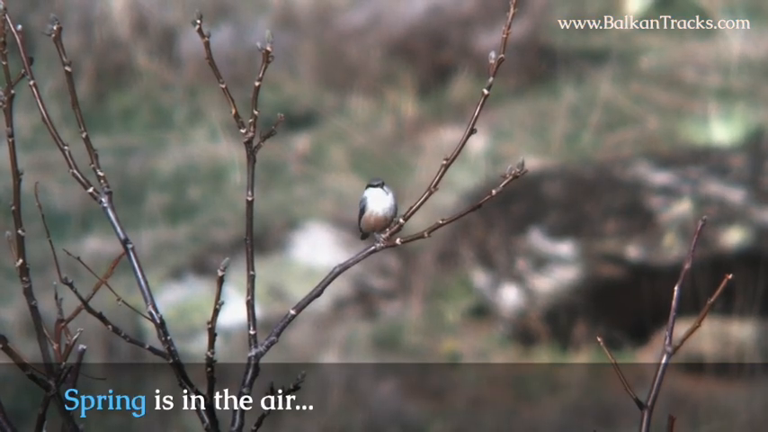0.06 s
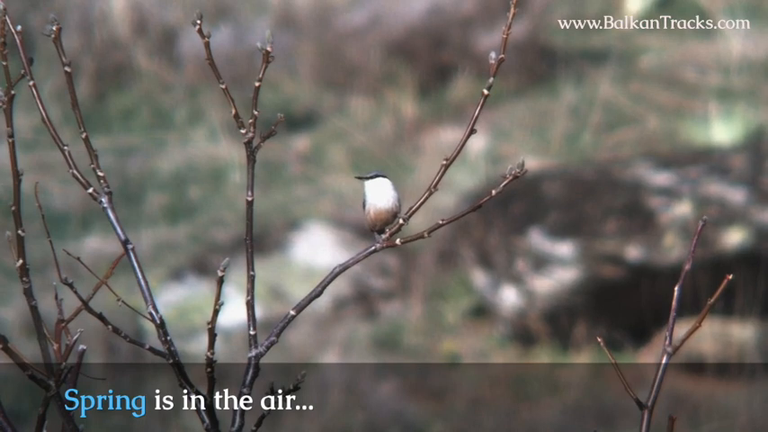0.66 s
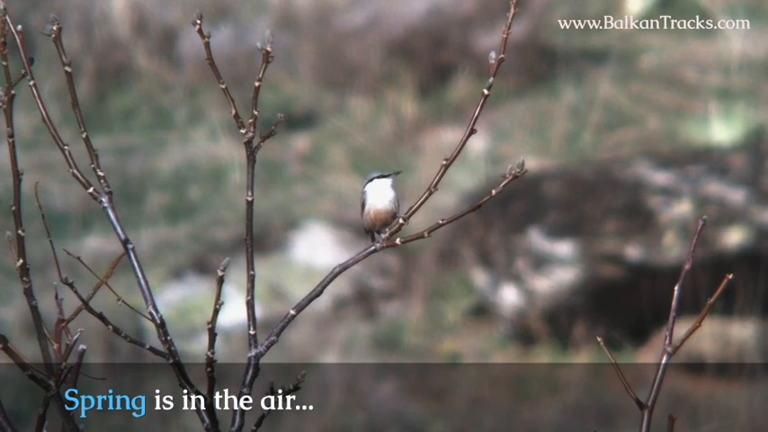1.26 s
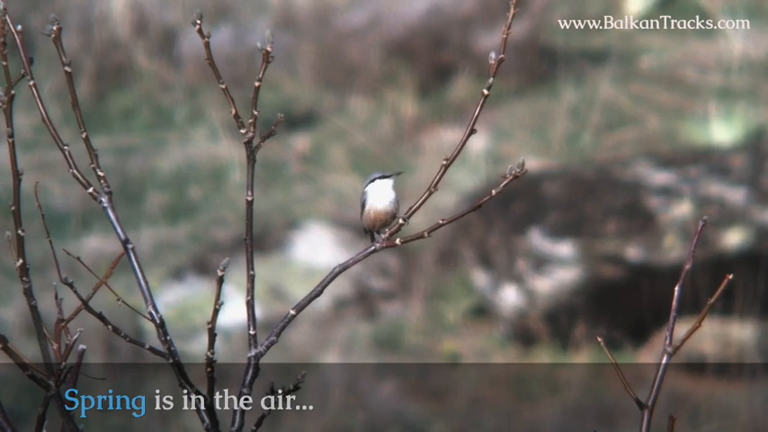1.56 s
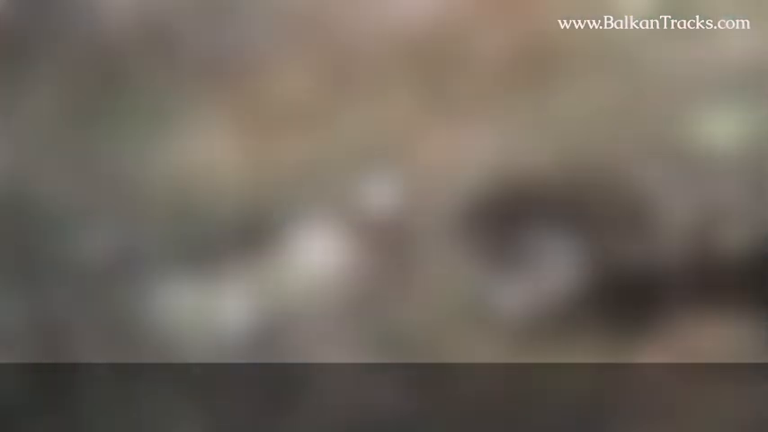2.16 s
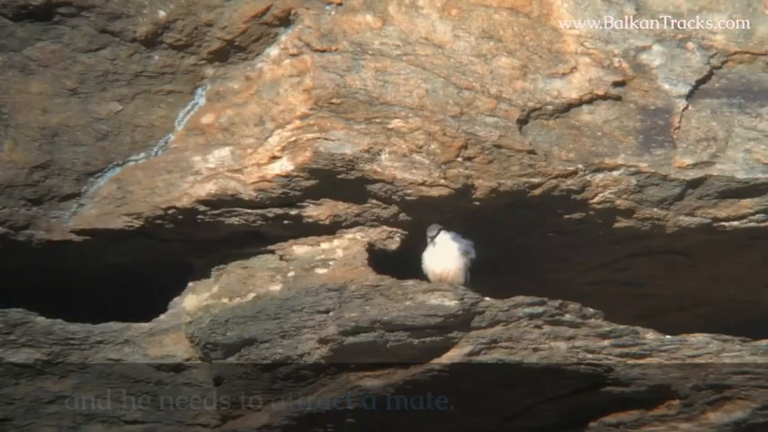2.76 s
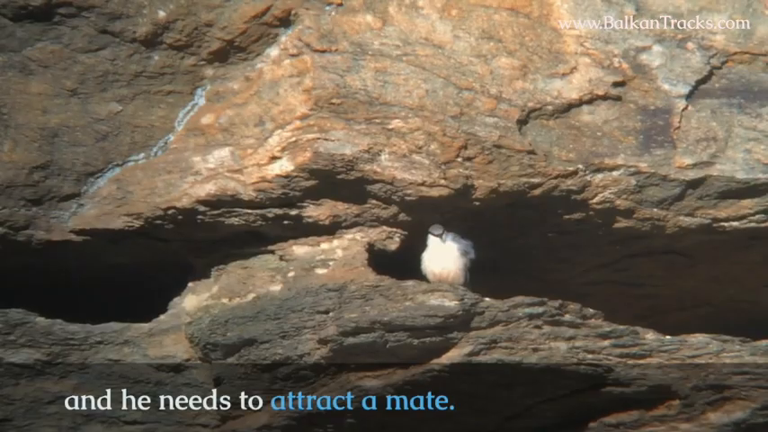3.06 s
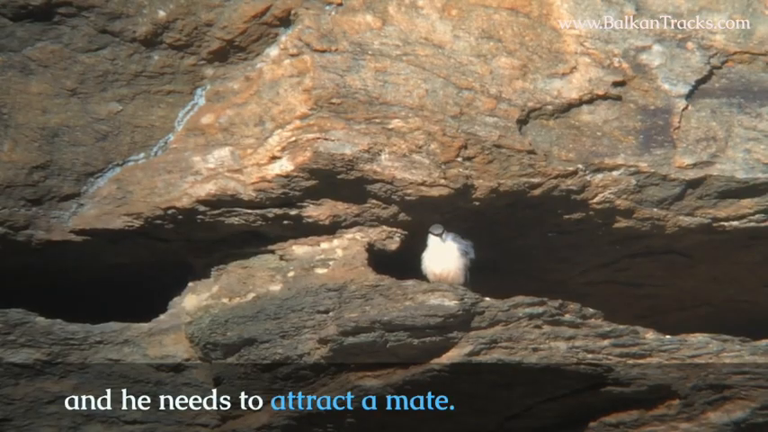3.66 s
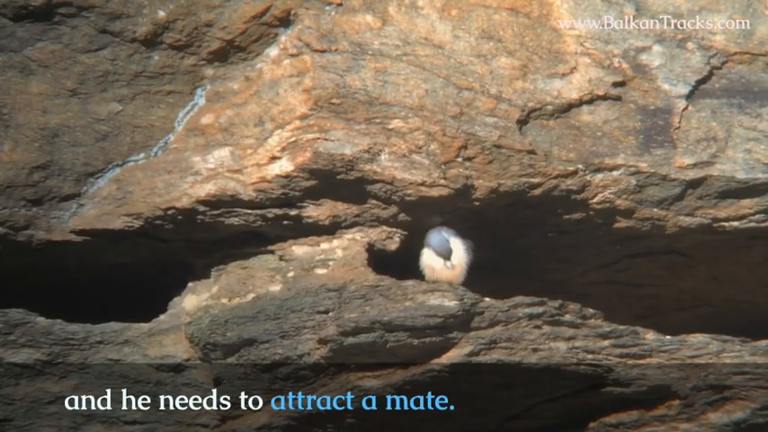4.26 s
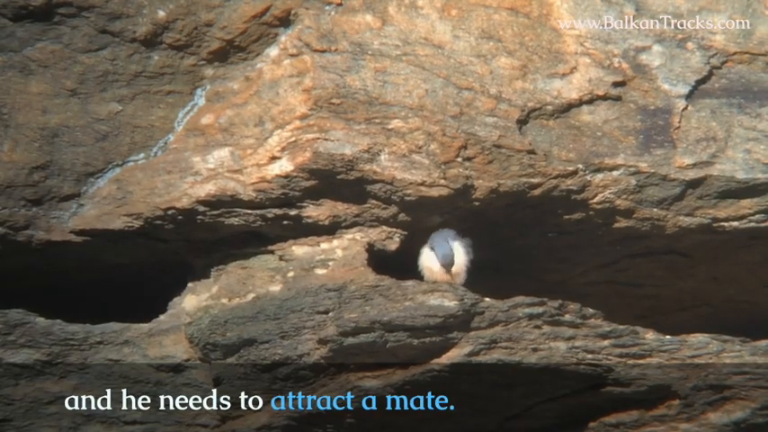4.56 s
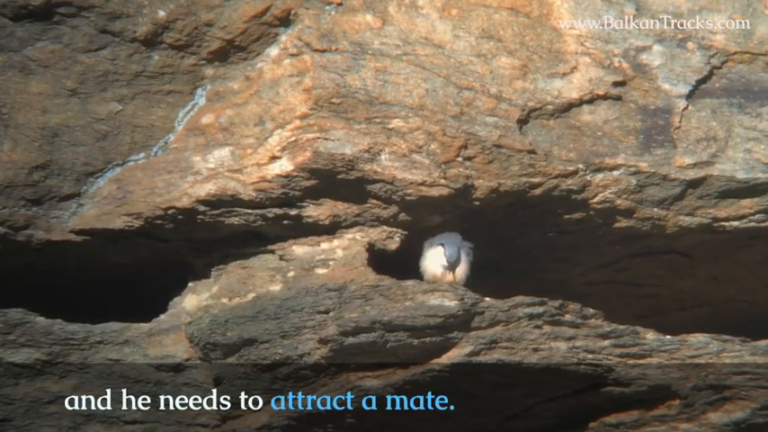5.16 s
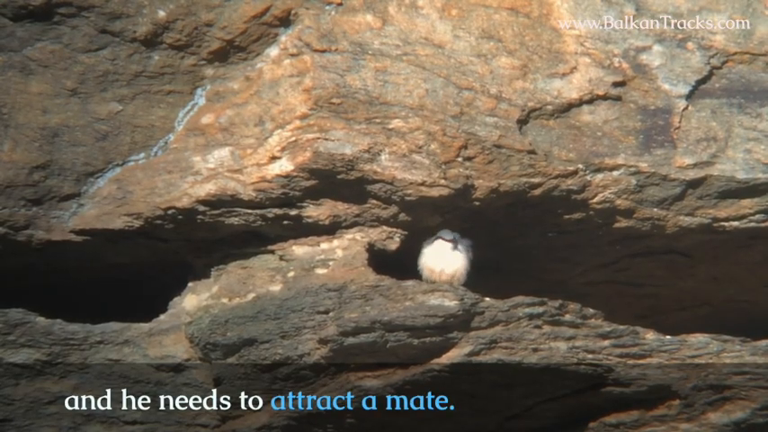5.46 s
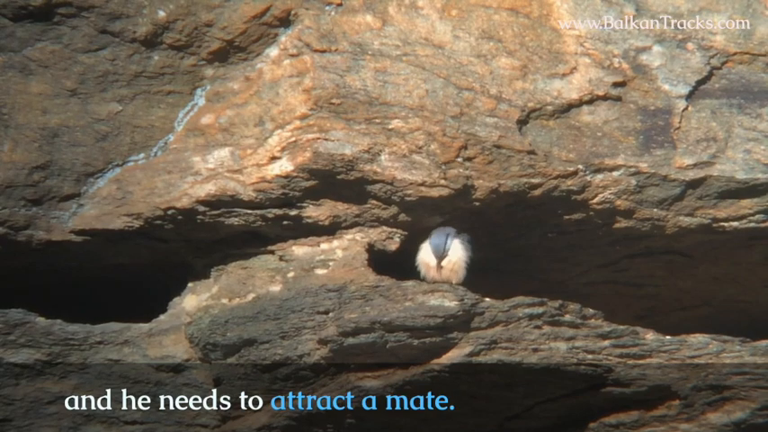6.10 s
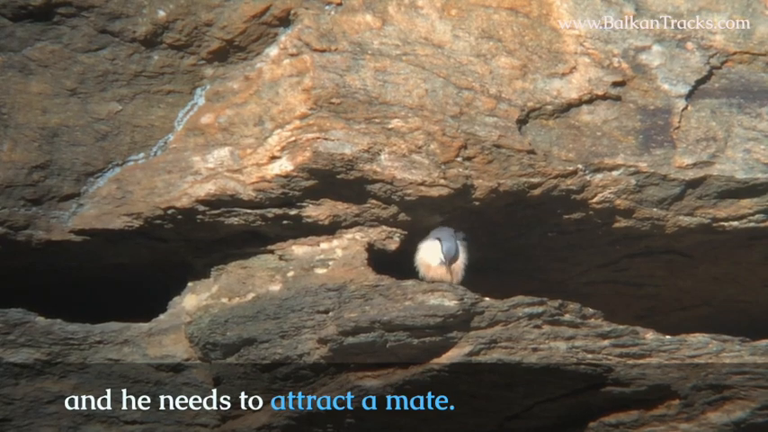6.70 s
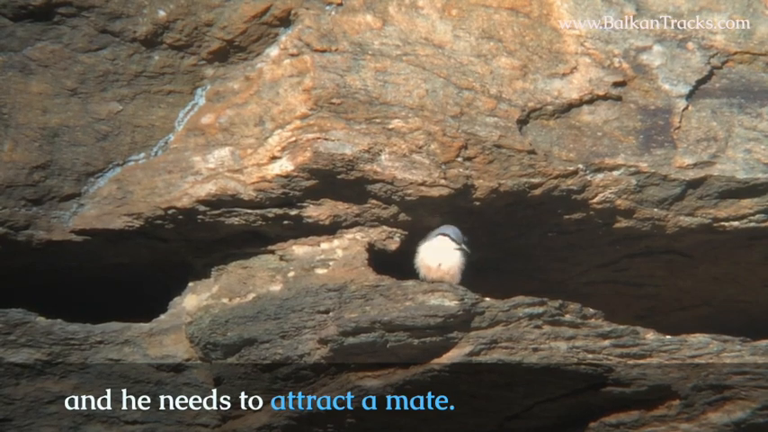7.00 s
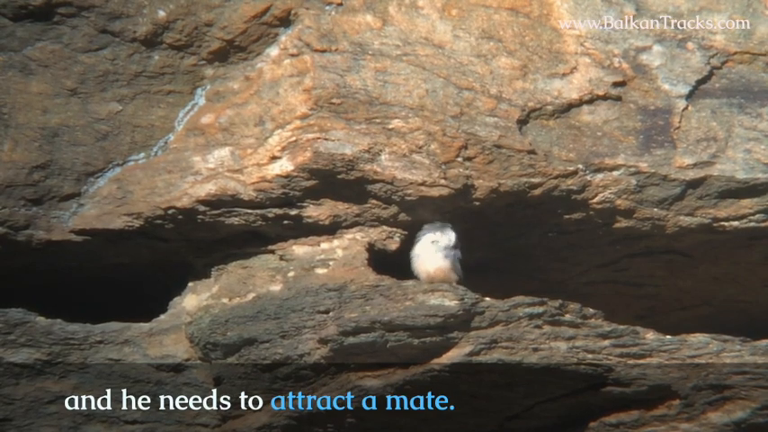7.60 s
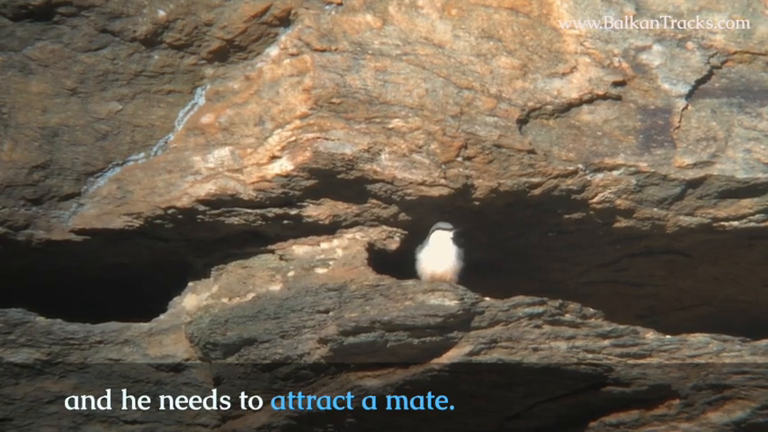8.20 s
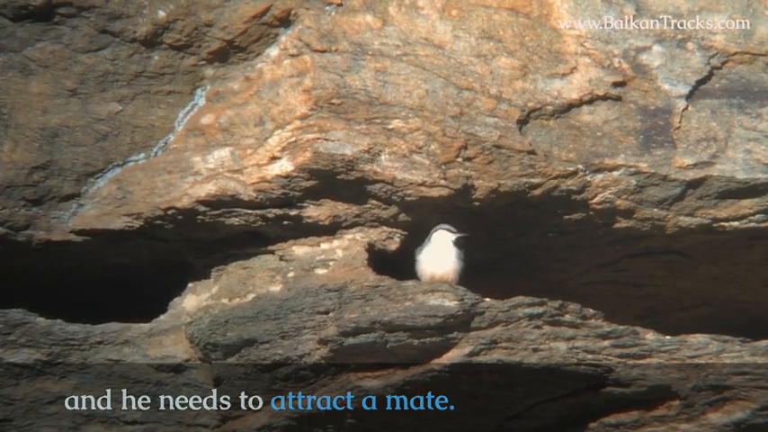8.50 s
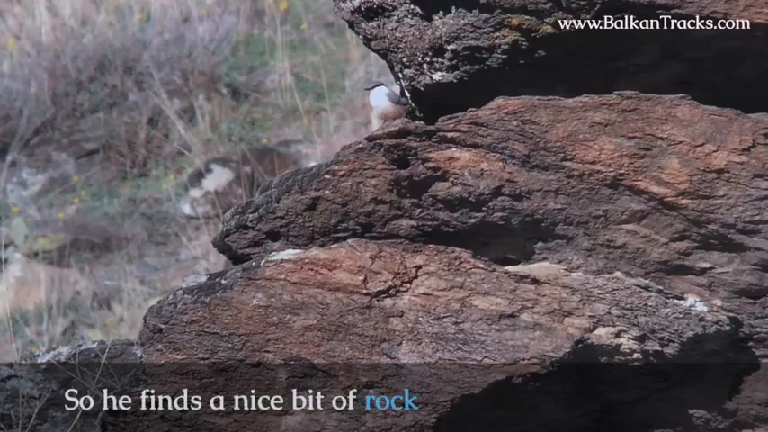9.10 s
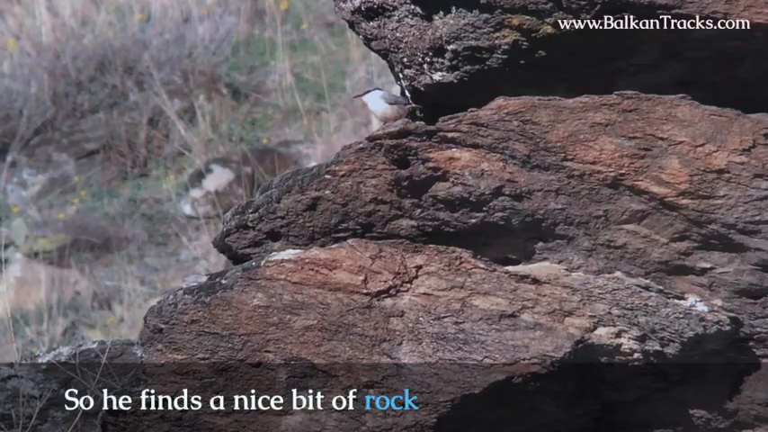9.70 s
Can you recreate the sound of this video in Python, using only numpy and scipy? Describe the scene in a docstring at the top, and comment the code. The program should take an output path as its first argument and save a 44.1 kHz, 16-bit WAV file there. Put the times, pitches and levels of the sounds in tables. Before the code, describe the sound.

A small songbird sings two trills of fast rising whistles outdoors, with faint distant birds and low wind buffeting the microphone.

```python
"""Two trills of fast upward whistles ring among rocks: a rock nuthatch, whose syrinx sweeps in pitch while
its beak filters the overtones and stone reflects each note. Other small birds twitter far off, mostly
between the trills, over the rush of a quiet valley, a few thin tones and a low drone. Gusts buffet the
microphone with turbulent pressure, die away in the middle and return with a few hard thumps."""
import sys
import numpy as np
from scipy import signal
from scipy.fft import rfft, irfft, next_fast_len
from scipy.io import wavfile
from scipy.ndimage import uniform_filter1d, map_coordinates

SR = 44100
rng = np.random.default_rng(int(sys.argv[2]) if len(sys.argv) > 2 else 0)


def store_wav(level_fs):
    """Save 16-bit WAV to argv[1]."""
    pcm = np.round(np.clip(np.atleast_2d(level_fs), -1, 1) * 32767)
    wavfile.write(sys.argv[1], SR, pcm.T.astype(np.int16))


N = 434385

# basic shape of a whistle, a long rise and a flick: time_from_flick_s, pitch_hz, whistle_db, overtones_db
SWEEP = [(-.07, 1480, -34.5, -13.5), (-.064, 1530, -28, -11.5), (-.054, 1700, -22.5, -10.5),
         (-.039, 2220, -14.5, -2.5), (-.032, 2550, -14, -8.5), (-.012, 3030, -0.5, 5),
         (-.003, 3280, 1.1, 2), (.0005, 3670, -13, 1.5), (.004, 3884, -11, 2.5), (.01, 4050, -48, -37)]
# gusts at the microphone: start_s, length_s, level_db, brightness_db
GUSTS = [(0.0, 0.18, -48, -18), (0.361, 0.092, -47, -23), (0.607, 0.074, -46, -11),
         (0.719, 0.1, -48.5, -15), (0.912, 0.12, -48.5, -16), (1.132, 0.056, -52, -6),
         (1.222, 0.1, -47, -12.5), (1.422, 0.082, -44, -17), (1.566, 0.078, -47.5, -18.5),
         (1.779, 0.052, -45.5, -13), (1.917, 0.069, -45, -15.5), (2.227, 0.13, -51.5, -19),
         (2.487, 0.13, -56.5, -17), (2.632, 0.098, -47.5, -20), (2.894, 0.063, -52.5, -17),
         (3.02, 0.09, -57, -15), (3.232, 0.036, -50, -11), (3.343, 0.035, -46.5, -16),
         (3.424, 0.031, -53.5, -15), (3.545, 0.06, -49.5, -9), (3.746, 0.076, -46.5, -10),
         (3.956, 0.11, -44.5, -9.5), (8.31, 0.064, -58, -12.5), (8.465, 0.03, -46, -15),
         (8.663, 0.098, -49.5, -10.5), (8.818, 0.04, -42.5, -14), (8.999, 0.035, -42.5, -9.5),
         (9.154, 0.049, -37.5, -6), (9.288, 0.086, -47.5, -8), (9.408, 0.088, -45, -8.5),
         (9.696, 0.023, -44, -21), (9.796, 0.026, -42.5, -9)]


def nuthatch(echo_s=.0295, stones_s=.0017, stones_db=-18, crags_db=-6, slope_db=-19, catch_lead_s=.027):
    """Reflection: a flat rock face echoes each note; stones, crags and the slope scatter it diffusely."""
    # notes of the trills: flick_s, level_db, pitch_factor, length_factor, push_db
    notes = [(0.0902, -22, 1.022, .98, -1), (0.2735, -22, 0.99, 1.005, -.5),
             (0.4543, -22.5, 1.002, 1.0, -1.5), (0.637, -22.5, 1.004, 0.97, -2),
             (0.8246, -23, 1.005, 0.93, -1), (1.022, -24.5, 1.018, 1.04, 2.5),
             (1.227, -23.5, 1.007, 0.94, 4), (8.673, -32, 0.96, 0.9, -0.5),
             (8.8637, -26, 0.995, 0.97, -0.5), (9.0465, -23.5, 1.017, .95, 0),
             (9.2244, -23, 0.99, 1.04, -1.5), (9.4061, -22.3, 1.008, 0.99, -1),
             (9.591, -23.5, 1.006, 0.97, -1.5), (9.7747, -23.5, 1, 0.96, -1)]
    # reflection from the rock face: frequency_hz, gain_db
    face = [(1500, -12), (2450, -11), (2900, -22.5), (3300, -28.5), (4000, -21), (11000, -18), (14000, -28)]
    # reverberation of nearby stones, of crags and of the whole slope: frequency_hz, t60_s
    stone_decay = [(3000, 0.2), (12000, 0.066)]
    crag_decay = [(2000, 0.2), (3200, 0.12), (12000, 0.073)]
    slope_decay = [(500, 0.44), (3000, 1), (6000, 0.42), (12000, .25)]
    reflection = amp(along(face, np.fft.rfftfreq(SR // 8, 1 / SR)))
    out = np.zeros(N)
    for s, db, pitch, length, push_db in notes:
        start = s + SWEEP[0][0] * length
        add(out, start - catch_lead_s, amp(-55) * catch())
        voice = amp(db) * whistle(pitch, length, push_db)
        echo = irfft(rfft(voice, SR // 8) * reflection)
        add(out, start, voice)
        add(out, start + stones_s, amp(stones_db) * scatter(voice, stone_decay))
        add(out, start + echo_s / 2, amp(crags_db) * scatter(echo, crag_decay))
        add(out, start + echo_s, echo)
        add(out, start + echo_s, amp(slope_db) * scatter(echo, slope_decay))
    return out


def whistle(pitch, length, push_db, bow_per_db=.002):
    """Source and filter: the syrinx sweeps upward while the opening beak recolours its harmonics."""
    # response of the beak: frequency_hz, nearly_shut_db, wide_open_db
    beak = [(3200, -22.5, -27.5), (3794, -35.5, -38), (4180, -50, -52), (5200, -41.5, -40),
            (6400, -53, -41.5), (8350, -59, -46.5), (9440, -51, -47.5), (10540, -30.5, -40),
            (11680, -37.5, -33), (12500, -46.5, -40.5), (14300, -62.5, -31.5), (15500, -55.5, -41.5)]
    band, shut_db, open_db = np.transpose(beak)
    when, hz, whistle_db, overtones_db = np.transpose(SWEEP)
    t = np.arange(when[0] * length, when[-1] * length, 1 / SR) / length
    shake = np.interp(t, [-.074, -.066, -.03], [.04, .008, .002])  # the syrinx is unsteady at first
    f = pitch * np.interp(t, when, hz) * (1 + shake * wobble(900, len(t)) + .011 * wobble(100, len(t)))
    middle = np.interp(t, [-.06, -.028, -.006], [0, 1, 0])
    f *= 1 + bow_per_db * push_db * middle  # a pushed note bows upward, brightens and swells
    phase = 2 * np.pi * np.cumsum(f) / SR
    voice = amp(np.interp(t, when, whistle_db) + .9 * wobble(130, len(t))) * np.sin(phase)
    bright_db = np.interp(t, when, overtones_db) + 1.6 + .97 * push_db
    gape = np.clip((f - 2300) / 1100, 0, 1)
    rasp = .11 * wobble(1500, len(t))  # cycle jitter frays the high overtones
    for k in range(2, 9):
        colour_db = (1 - gape) * np.interp(k * f, band, shut_db) + gape * np.interp(k * f, band, open_db)
        gain = amp(bright_db + colour_db + 1.6 * wobble(90, len(t)))
        voice += gain * (k * f < SR / 2) * np.sin(k * (phase + rasp))
    return voice * amp(push_db * middle)


def catch(length_s=.031, hz=2100, roughness=.12, sizzle_db=-18):
    """Onset transient: the syrinx starts with a hoarse, irregular sound just ahead of each whistle."""
    u = np.linspace(0, 1, int(length_s * SR))
    f = hz * (1 + .037 * rng.normal() + .2 * (u - .5) + roughness * wobble(1000, len(u)))
    tone = np.interp(u, [0, .18, .3, 1], [0, .54, .82, .48]) * sine(f)
    sizzle = amp(sizzle_db) * np.sqrt(u) * sine(11200 + 1100 * wobble(2500, len(u)))
    return signal.windows.tukey(len(u), .15) * amp(2.5 * wobble(250, len(u))) * (tone + sizzle)


def wind(lumps_db=3, edge_growth=1.49):
    """Turbulence: eddies hit the microphone in lumps, reaching higher in pitch in the brighter gusts."""
    # pressure spectrum of the eddies: frequency_hz, density_db
    buffet = [(12, -49.5), (20, -18.5), (86, -0.5), (120, 1), (216, -8), (328, -25), (369, -30.5),
              (497, -37.5), (700, -37.5), (910, -64), (1540, -120)]
    eddies = amp(lumps_db * wobble(60, N))
    bright_db, = curves([(s + length / 2, brightness) for s, length, _, brightness in GUSTS])
    edge = noise([(100, -25), (250, -1.5), (400, -7.5), (700, -28), (1300, -50.5)])
    swirl = unit(eddies * noise(buffet)) + amp(edge_growth * bright_db) * unit(eddies ** 2 * edge)
    power = np.abs(uniform_filter1d(swirl ** 2, size=SR // 12))
    return airflow() * swirl / np.sqrt(power + 1e-9)  # the airflow alone sets the slower swells


def airflow(fade_s=.01, unsteady_db=3, attack_s=.0081, release_s=.013):
    """Amplitude envelope of the wind: gusts rise, hold and decay exponentially over an unsteady breeze."""
    # spells of breeze: start_s, end_s, first_db, last_db
    breeze = [(0, 2.09, -56.5, -54.5), (2.09, 4.08, -64.5, -57.5), (8.29, 9.85, -64.5, -63.5)]
    t = np.arange(N) / SR
    flow = np.zeros(N)
    for start, end, first_db, last_db in breeze:
        fade = np.clip(np.minimum(t - start, end - t) / fade_s, 0, 1)
        flow += fade * amp(np.interp(t, [start, end], [first_db, last_db]))
    flow *= amp(unsteady_db * wobble(13, N))
    for s, length, db, _ in GUSTS:
        away = np.maximum(s - t, 0) / attack_s + np.maximum(t - s - length, 0) / release_s
        flow = np.maximum(flow, amp(db) * np.exp(-away))
    return flow


def thumps(width_rad=1.32):
    """Pressure pulses: a hard eddy is a swing or two of pressure."""
    # hard eddies: middle_s, level_db, pitch_hz
    eddies = [(1.926, -33.5, 143), (8.827, -31, 85), (8.845, -29.5, 122.6), (8.859, -26, 398),
              (9.013, -32, 99.3), (9.156, -35, 151), (9.171, -24.5, 162), (9.349, -28.5, 420),
              (9.44, -31.5, 277), (9.491, -36, 238), (9.706, -33.5, 122)]
    out = np.zeros(N)
    t = np.arange(-SR // 30, SR // 30) / SR
    for s, db, hz in eddies:
        phase = 2 * np.pi * hz * t
        add(out, s + t[0], amp(db) * np.sin(phase) / np.cosh(phase / width_rad))
    return out


def far_birds(wet_db=-1.5, waver=.011, blur_per_db=.0029, near_db=-66):
    """Direct-to-reverberant ratio: the fainter a call, the more blurred and reverberant it arrives."""
    direct, send = np.zeros(N), np.zeros(N)
    for s, db, length, pitches, warble in far_calls():
        call = amp(db) * chirp(length, *pitches, waver + blur_per_db * max(near_db - db, 0), warble)
        add(direct, s - length / 2, call)
        add(send, s - length / 2, amp(.34 * (-71 - db)) * call)
    return direct + amp(wet_db) * scatter(send, [(2000, .2), (6000, .26)])[:N]


def far_calls(sag=.0592, warble=.048):
    """Pitch contours of the far calls: middle_s, level_db, length_s, three pitches_hz, warble_depth."""
    # high hairpin calls, rising slurs and falling slurs: middle_s, middle_hz, level_db
    arches = [(1.415, 5540, -75), (1.51, 5350, -77), (1.864, 5640, -76), (1.975, 5470, -77),
              (2.5, 5030, -72.5), (2.6, 5030, -75), (2.95, 5630, -69.5), (3.045, 5300, -74.5),
              (3.797, 5880, -64), (3.795, 6650, -68), (3.85, 5830, -61.5), (3.852, 6850, -69),
              (5.79, 5700, -76.5), (6.835, 4970, -80), (7.44, 5850, -71), (7.885, 5300, -73),
              (7.962, 4930, -73.5)]
    upslurs = [(1.332, 3240, -62.5), (1.432, 2520, -66.5), (1.552, 3550, -65), (3.28, 3480, -70.5),
               (3.752, 3280, -66.5), (3.925, 4180, -66), (7.572, 1650, -72.5)]
    downslurs = [(2.545, 2210, -74), (3.015, 1990, -72), (3.068, 2610, -71), (3.13, 2100, -74.5),
                 (3.367, 2080, -76), (4.29, 3550, -75), (4.637, 2710, -70.5), (4.84, 2480, -73),
                 (4.95, 2570, -64), (4.978, 1756, -78), (5.318, 3830, -73.5), (5.80, 2490, -77),
                 (6.01, 3670, -75), (7.735, 2710, -66)]
    # long warbles: middle_s, length_s, middle_hz, glide_ratio, level_db
    warbles = [(1.998, 0.14, 3050, -0.28, -62), (2.873, 0.14, 2650, -.07, -64.5),
               (3.242, .19, 3020, -0.31, -66.5), (4.191, .11, 3410, .07, -76),
               (7.03, .12, 2450, -0.05, -79), (7.235, 0.12, 3160, 0.21, -72.5),
               (7.342, .14, 2750, 0.074, -65.5), (7.5, .08, 2830, -0.058, -66),
               (8.355, .22, 3000, -.33, -68.5)]
    # calls on both voices of the syrinx at once: middle_s, level_db
    double_calls = [(4.912, -67), (5.784, -73.5), (6.32, -66.5), (7.695, -70.5)]
    # those two voices: length_s, first_hz, middle_hz, last_hz, gain_db
    voices = [(.065, 2400, 2950, 2780, 2), (0.038, 3200, 3920, 3450, 2)]
    calls = []
    for rows, length, ratios in [(arches, .06, (.68, 1, .68)), (upslurs, .052, (.771, 1, 1.21)),
                                 (downslurs, .065, (1.4, 1, .83))]:
        calls += [(s, db, length, hz * np.array(ratios), 0) for s, hz, db in rows]
    for s, length, hz, glide, db in warbles:
        ratios = np.array([1 + sag - glide / 2, 1, 1 + sag + glide / 2])
        calls.append((s, db, length, hz * ratios, warble))
    for s, db in double_calls:
        calls += [(s, db + gain_db, length, pitches, 0) for length, *pitches, gain_db in voices]
    return calls


def chirp(length_s, first, middle, last, waver, warble=0, warble_hz=48):
    """Frequency modulation: a whistle wavers along an arc through three pitches, and may warble."""
    u = np.linspace(0, 1, int(length_s * SR))
    arc = np.polyval(np.polyfit([0, .5, 1], [first, middle, last], 2), u)
    vibrato = warble * np.sin(2 * np.pi * warble_hz * length_s * u)
    jitter = waver * (wobble(170, len(u)) + .5 * wobble(800, len(u)))
    envelope = signal.windows.tukey(len(u), .35) * amp(3.6 * wobble(109, len(u)))
    return envelope * sine(arc * (1 + vibrato + jitter))


def chatter(direct=1.7, wet=1.12):
    """Air absorption weakens the higher calls of the farthest birds, which merge into faint twittering."""
    # bouts of twittering: start_s, end_s, calls_per_s, level_db
    bouts = [(1.351, 2.198, 36, -84.5), (2.2, 3.601, 91, -84), (3.601, 5.601, 30, -86.5),
             (6.749, 8.1, 34, -85)]
    calls = np.zeros(N)
    for start, end, rate, db in bouts:
        count = int(rate * (end - start))
        draws = rng.uniform([start, .03, 2200, -.3, -.05], [end, .08, 4900, .3, .2], (count, 5))
        for s, length, hz, rise, arch in draws:
            call = chirp(length, hz * (1 - rise), hz * (1 + arch), hz * (1 + rise), waver=.02)
            add(calls, s, amp(db) * 3200 / hz * call)
    return direct * calls + wet * scatter(calls, [(2000, .45), (6000, .19)])[:N]


def far_tones(flutter_db=4, smear_rad=3):
    """Random modulation broadens faint pure tones, which flutter as they decay."""
    # thin tones from far down the valley: start_s, length_s, pitch_hz, level_db, t60_s
    tones = [(3.73, 1.0, 2355, -71, 2.8), (5.088, 0.11, 3160, -78, 3), (6.119, 1.26, 2100, -74, 8.2),
             (6.401, 0.49, 2063, -70, 3.4), (6.72, 0.82, 1786, -75.5, 5.2), (8.421, .13, 3220, -76, 3)]
    out = np.zeros(N)
    for s, length, hz, db, t60 in tones:
        t = np.arange(int(length * SR)) / SR
        phase = 2 * np.pi * hz * t + smear_rad * wobble(100, len(t))
        level_db = db - 60 * t / t60 + flutter_db * wobble(20.4, len(t))
        add(out, s, signal.windows.tukey(len(t), .12) * amp(level_db) * np.sin(phase))
    return out


def drone():
    """Narrow-band noise: a low far-off drone swells and sinks while the wind rests."""
    # bell-shaped swells: peak_s, width_s, level_db
    swells = [(4.45, 0.25, -76.5), (5.2, 0.14, -79), (6.1, 0.24, -71), (7.85, 0.28, -76.5)]
    t = np.arange(N) / SR
    level = sum(amp(db) * np.exp(-.5 * ((t - s) / width) ** 2) for s, width, db in swells)
    return level * noise([(200, -39), (300, -1.5), (350, .5), (430, -10), (650, -26.5), (1200, -70)])


def valley(body_db=7.5):
    """Broadband ambient noise: the quiet rush of open country under a fine hiss."""
    # spectrum of the rush: frequency_hz, density_db
    rush_spectrum = [(15, -43), (25, -5), (82, 0), (313, -1.5), (614, -6), (1170, -7), (1570, -12.5),
                     (2360, -12.5), (3930, -11.5), (4260, -18.5), (6380, -22.5), (12800, -27), (14300, -31),
                     (15500, -41)]
    # slow drift of the two layers: time_s, rush_db, hiss_db
    drift = [(0.0, -76, -78.5), (0.11, -79.5, -76), (0.22, -79, -83), (0.76, -78.5, -86.5),
             (1.81, -76, -84.5), (4.0, -76.5, -79), (4.33, -79.5, -80.5), (6.31, -77, -87),
             (8.23, -78.5, -84.5), (8.67, -70, -78), (8.92, -76, -81), (9.46, -75.5, -89), (9.85, -78, -88)]
    rush_db, hiss_db = curves(drift)
    rush = amp(rush_db + body_db) * noise(rush_spectrum)
    hiss = amp(hiss_db) * noise([(1500, -24.5), (3000, 4), (5000, 4.5), (7000, -2), (15000, -7)])
    return rush + hiss


def scatter(x, decay):
    """Diffuse reverberation: convolution with a unit-energy tail that dies by (frequency_hz, t60_s)."""
    hz, t, spectra = signal.stft(rng.standard_normal(SR * 3 // 4), SR, nperseg=256)
    tail = signal.istft(spectra * amp(-60 * t / along(decay, hz)[:, None]), SR, nperseg=256)[1]
    return signal.fftconvolve(x, tail / np.linalg.norm(tail))


def noise(spectrum):
    """Noise of rms 1, coloured by (frequency_hz, density_db) points."""
    return unit(filtered(rng.standard_normal(N), lambda hz: amp(along(spectrum, hz))))


def filtered(x, response):
    """Linear filtering: the spectrum of x times a frequency response."""
    size = next_fast_len(N + SR // 2)
    return irfft(rfft(x, size) * response(np.fft.rfftfreq(size, 1 / SR)), size)[:N]


def sine(hz):
    """A gliding tone: phase is the integral of frequency."""
    return np.sin(2 * np.pi * np.cumsum(hz) / SR)


def wobble(rate, size):
    """A smooth random curve, rate knots a second."""
    knots = rng.standard_normal(int(size * rate / SR) + 4)
    return map_coordinates(knots, [np.arange(size) * rate / SR], mode="nearest")


def along(points, hz):
    """Read (frequency_hz, value) points on a log axis."""
    f, values = np.transpose(points)
    return np.interp(np.log(hz + 1), np.log(f + 1), values)


def curves(rows):
    """One value per sample for each column after the time."""
    s, *columns = np.transpose(rows)
    return [np.interp(np.arange(N) / SR, s, column) for column in columns]


def amp(db):
    """Decibels to gain."""
    return 10 ** (np.asarray(db) / 20)


def unit(x):
    """Scale to rms 1."""
    return x / np.sqrt(np.mean(x ** 2) + 1e-20)


def add(out, s, sound):
    """Mix a sound in from time s."""
    i = round(s * SR)
    part = sound[max(-i, 0):max(N - i, 0)]
    out[max(i, 0):][:len(part)] += part


def scene():
    """Superposition: birds, wind and valley sum at one microphone."""
    birds = nuthatch() + far_birds() + chatter()
    return (birds + far_tones() + wind() + thumps() + valley() + drone())[None]


def record(dry, low_cut_hz=42, top_hz=15800):
    """Band limiting: a second-order high-pass thins the deepest bass, and nothing passes above top_hz."""
    def response(hz):
        return (hz < top_hz) * hz ** 2 / np.hypot(hz ** 2, low_cut_hz ** 2)
    return np.array([filtered(channel, response) for channel in dry])


dry = scene()
out = record(dry)
store_wav(out)
```